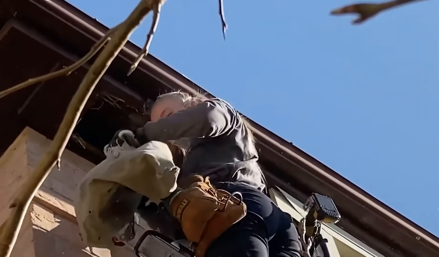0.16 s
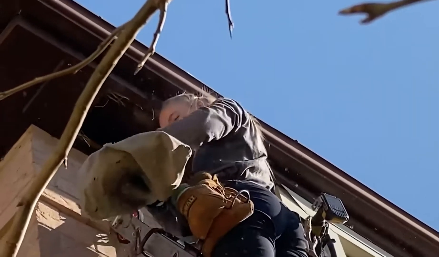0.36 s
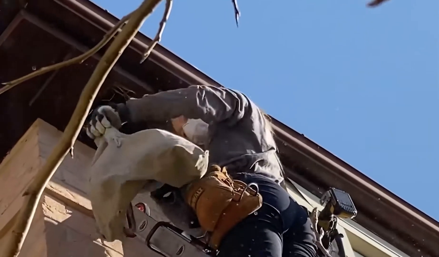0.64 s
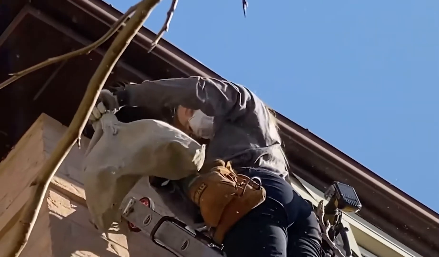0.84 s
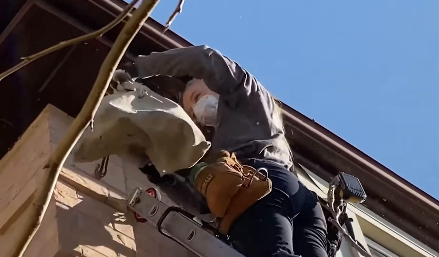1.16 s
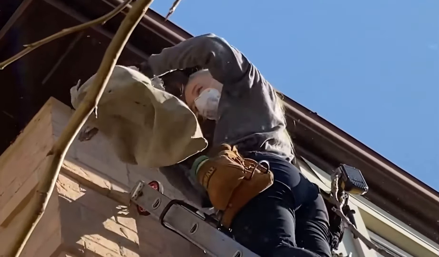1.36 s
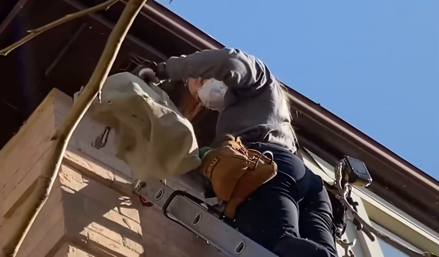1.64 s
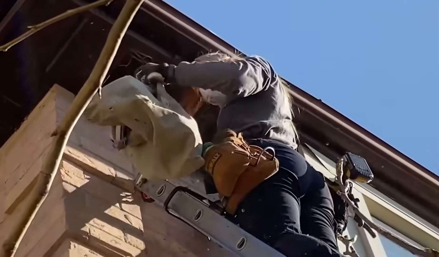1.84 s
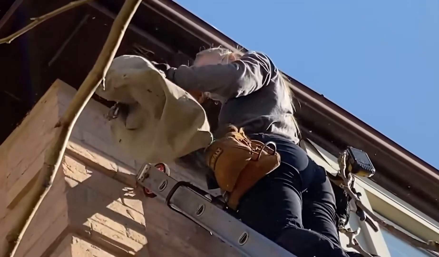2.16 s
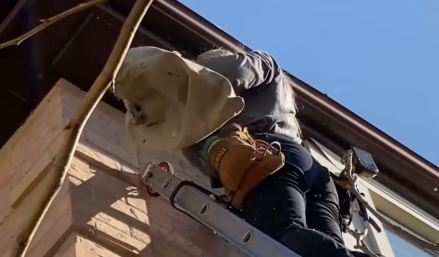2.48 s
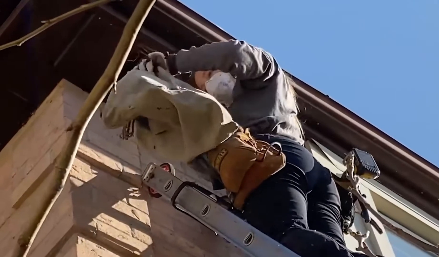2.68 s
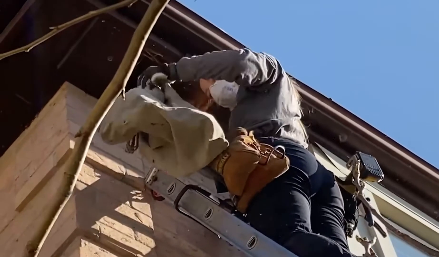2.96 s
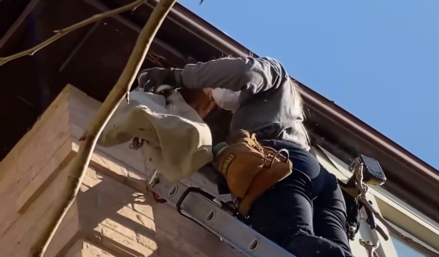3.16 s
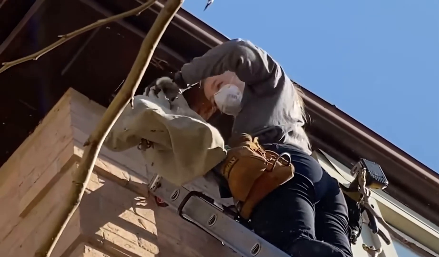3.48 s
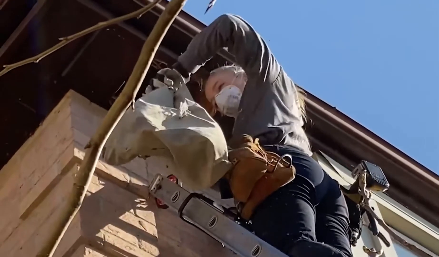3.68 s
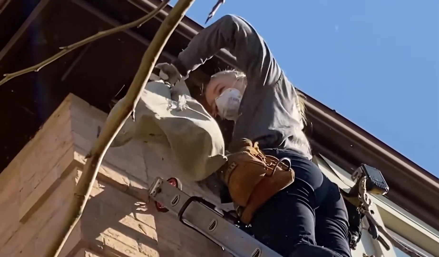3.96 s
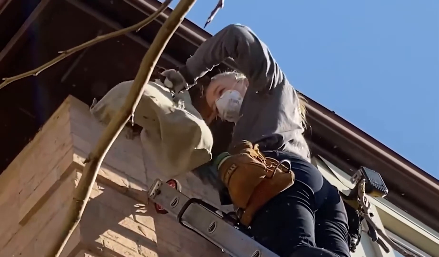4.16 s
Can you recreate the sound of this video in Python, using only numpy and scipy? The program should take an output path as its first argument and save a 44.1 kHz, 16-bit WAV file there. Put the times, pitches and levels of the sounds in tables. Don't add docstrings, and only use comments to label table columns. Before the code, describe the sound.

Harsh quick animal chirps in bouts fade to a thin broken whimper, followed by soft bag rustles and a faint far bird outdoors.

```python
import sys
import numpy as np
from scipy import signal
from scipy.fft import rfft, irfft, next_fast_len
from scipy.io import wavfile
from scipy.ndimage import map_coordinates

SR = 44100
rng = np.random.default_rng(int(sys.argv[2]) if len(sys.argv) > 2 else 0)


def volts_from_decibels(level):
    exponent = np.asarray(level, float) / 20
    return 10 ** exponent


def transcribe(signal):
    frames = np.atleast_2d(signal).T
    limited = np.clip(frames, -1, 1)
    pcm = np.round(limited * 32767).astype(np.int16)
    wavfile.write(sys.argv[1], SR, pcm)


N = 190644
T = np.arange(N) / SR

# frequency_hz, density_db (per Hz)
RASP = [(400, -42.5), (1000, -27), (1750, -14.5), (2150, 0.5), (4500, -3), (5100, -10), (6800, -15),
        (9500, -5.5), (12000, -14.5), (15500, -25)]


def unit(x):
    return x / np.sqrt(np.mean(x ** 2) + 1e-20)


def along(points, hz):
    f, value = np.transpose(points)
    return np.interp(np.log(hz + 1), np.log(f + 1), value)


def wobble(rate, size=N):
    knots = rng.standard_normal(size // 64 + 8)
    places = np.arange(0, size + 32, 32)
    coarse = map_coordinates(knots, [places * rate / SR])
    return np.interp(np.arange(size), places, coarse)


def filtered(x, response):
    size = next_fast_len(x.shape[-1] + 2048)
    spectrum = rfft(x, size) * response(np.fft.rfftfreq(size, 1 / SR))
    return irfft(spectrum, size)[..., :x.shape[-1]]


def noise(spectrum, shape=(2, N)):
    return unit(filtered(rng.standard_normal(shape), lambda hz: volts_from_decibels(along(spectrum, hz))))


def chirps(table, onset, release, bright_db, rise=0.01504, jitter=.018, flutter_hz=290, flutter=.25, patchy_db=5):
    # frequency_hz, gain_db
    throat = [(1500, -7), (1900, -21.5), (2030, -12), (2200, 5.5), (3000, 15), (3800, -5), (4400, -1.5),
              (5500, -23.5), (6000, -27.5), (15000, -25)]
    breakup_db = 9
    out = np.zeros(N + SR)
    t = np.arange(-2048, 2048) / SR
    size = len(t)
    for s, length, hz, tone_db, rasp_db in table:
        u = 2 * t / length
        shape = np.exp(-np.abs(u) ** np.where(u < 0, onset, release))
        skirt = np.exp(-np.abs(u / 2.1) ** 2)
        rough = 1 / (1 + volts_from_decibels(tone_db - rasp_db - 4.5))
        beat_hz = flutter_hz * (1 + .15 * wobble(60, size))
        beat = np.cos(2 * np.pi * np.cumsum(beat_hz) / SR)

        unsteady = rough * (jitter * wobble(300, size) + 0.037 * beat)
        pitch = hz * (1 + rise * np.clip(u, -2, 1) + unsteady)
        phase = 2 * np.pi * np.cumsum(pitch) / SR
        tone = unit(sum(volts_from_decibels(along(throat, k * hz)) * np.sin(k * phase) for k in range(1, 7)))

        drift = 1 + jitter * wobble(250, size) + 0.074 * beat
        second = np.sin(2 * np.pi * np.cumsum(tightening(s) * drift) / SR)
        second = volts_from_decibels(np.clip(3 * wobble(150, size), -9, 3)) * second

        ripple = patchy_db * rng.standard_normal(80)
        effort_db = bright_db + .15 * (rasp_db + 20.5)
        mouth = lambda f: volts_from_decibels(np.interp(f / 200, range(80), ripple) + effort_db * (f > 4500))
        breath = filtered(noise(RASP, shape=size), mouth)
        rasp = 0.6 * unit((1 + flutter * beat) ** 2 * breath) + 0.65 * second

        voiced = (shape + .06 * skirt) * volts_from_decibels(tone_db) * (1 + 0.28 * rough * beat) * tone
        voiced = voiced * volts_from_decibels(rough * np.clip(breakup_db * wobble(220, size), -14, 5))
        chirp = voiced + (shape + 0.36 * skirt) * volts_from_decibels(rasp_db) * rasp
        out[round(s * SR):][:size] += chirp
    return out[2048:][:N]


def tightening(s):
    bout_starts = [
        0,
        .72,
        1.4,
        2.26,
    ]
    from_hz, to_hz, wait_s, climb_s = 2400, 3270, .05, .09
    since = max(s - wait_s - max(start for start in bout_starts if start <= s), 0)
    return to_hz - (to_hz - from_hz) * np.exp(-since / climb_s)


def hoarse(width_hz=220):
    # peak_s, hold_s, level_db, fall_db_per_s
    swells = [
        (0, .05, -41, 52),
        (.905, .012, -43, 123.5),
        (1.59, .13, -45, 109.5),
        (2.38, .05, -63.5, 38.5),
    ]
    rise_db_per_s = 184
    level = sum(volts_from_decibels(db - rise_db_per_s * np.maximum(s - T, 0) - fall * np.maximum(T - s - hold, 0))
                for s, hold, db, fall in swells)

    def ring(f, center_hz):
        band = 1j * width_hz * f
        return 1.4 * band / (center_hz ** 2 - f * f + band)

    rings = lambda f: 1 + sum(ring(f, center_hz) for center_hz in (2150, 2800, 3900))
    return volts_from_decibels(3.5 + 2.7 * wobble(45)) * level * unit(filtered(noise(RASP, shape=N), rings))


def grunts(ring=.9):
    # middle_s, level_db, chest_pitch_hz
    puffs = [(.051, -41.5, 1558), (.132, -45.5, 1497), (.205, -42, 1572), (.275, -45, 1560),
             (.375, -39, 1400), (.812, -46, 974), (.894, -41.5, 1487), (1.006, -41.5, 1440),
             (1.124, -52, 1550), (1.557, -47, 883), (1.635, -42.5, 1262), (1.74, -38, 1095),
             (1.803, -37.5, 1149), (1.839, -45, 1443), (2.264, -45, 1000), (2.337, -45, 800),
             (2.766, -47, 850)]
    # frequency_hz, density_db (per Hz)
    chest = [(350, -23.5), (700, -4.5), (1000, -2), (1500, -2), (2300, 0.5), (3200, -43.5)]
    length_s = 0.026
    s, db, hz = np.transpose(puffs)
    level = sum(volts_from_decibels(peak_db) * np.exp(-(2 * (T[::8] - middle) / length_s) ** 2) for middle, peak_db in zip(s, db))
    nearest = np.searchsorted((s[1:] + s[:-1]) / 2, T)
    pitch = hz[nearest] * (1 + .06 * wobble(150))
    tone = np.sin(2 * np.pi * np.cumsum(pitch) / SR)
    return np.repeat(level, 8)[:N] * (noise(chest, shape=N) + ring * tone)


def whimper(breaks_db=9):
    # time_s, pitch_hz, level_db, opening_db (second partial over fundamental)
    cry = [
        (2.385, 1930, -56, -5.5),
        (2.408, 1882, -57.5, 4),
        (2.46, 1850, -58, 0.5),
        (2.564, 1867, -52.5, -2),
        (2.583, 1770, -59, 1),
        (2.616, 1751, -60.5, 7.5),
        (2.705, 1877, -57.5, 3.5),
        (2.73, 1716, -60.5, 6.5),
        (2.755, 1523, -66, 0.5),
    ]
    s, hz, level_db, opening_db = np.transpose(cry)
    pitch = np.interp(T, s, hz) * (1 + .008 * wobble(60) + .02 * wobble(400))
    phase = 2 * np.pi * np.cumsum(pitch) / SR
    level = volts_from_decibels(np.interp(T, np.r_[s[0] - .02, s, s[-1] + .02], np.r_[-110, level_db, -110]))
    low = level * volts_from_decibels(-breaks_db * np.abs(wobble(60))) * np.sin(phase)
    high = level * volts_from_decibels(np.interp(T, s, opening_db) - breaks_db * np.abs(wobble(45)))
    upper = np.sin(2 * phase) + 0.049 * np.sin(4 * phase) + 0.037 * np.sin(5 * phase)
    return volts_from_decibels(12) * (low + high * upper)


def whistles(calls, blur, edge=3.0):
    out = np.zeros(N)
    for s, length, first_hz, last_hz, db in calls:
        u = (T - s) / length
        glide = first_hz + (last_hz - first_hz) * np.clip(u, 0, 1)
        hz = glide * (1 + blur * wobble(250))
        level = volts_from_decibels(db + 8 - 6 * np.abs(wobble(45))) * np.exp(-np.abs(2 * u - 1) ** edge)
        out += level * np.sin(2 * np.pi * np.cumsum(hz) / SR)
    return out


def mews():
    # start_s, length_s, first_pitch_hz, last_pitch_hz, level_db
    calls = [
        (.49, 0.13, 1370, 1564, -57.5),
        (.62, 0.034, 1676, 1700, -50.5),
        (1.885, 0.05, 1930, 1995, -50),
        (1.96, 0.056, 1950, 1995, -47.5),
        (2.29, 0.054, 1040, 1124, -60),
        (2.62, 0.081, 900, 972, -58),
        (2.77, 0.099, 1286, 1415, -64),
    ]
    return whistles(calls, blur=.014)


def bag():
    # time_s, peak_db, fade_s
    creases = [
        (2.1795, -44, 0.018),
        (3.0185, -50.5, 0.062),
        (3.5129, -41, 0.05),
        (3.5394, -54, 0.038),
        (3.5782, -49.5, 0.05),
        (3.6514, -56.5, 0.043),
        (3.7703, -46, 0.0095),
        (4.1394, -49.5, 0.05),
    ]
    # middle_s, width_s, level_db
    stirs = [
        (.1, .6, -59.5),
        (1.3, .15, -71),
        (2.55, 0.25, -65),
        (3.2, 0.25, -73),
        (3.62, 0.14, -66),
        (4.2, .08, -70),
    ]
    # frequency_hz, density_db (per Hz)
    canvas = [(600, -8), (1500, 2.5), (4000, -6.5), (6500, -13), (9000, -14.5), (15500, -20)]
    air = [(900, -25.5), (1800, 5), (2500, 4.5), (4000, 0), (7000, -20), (11000, -14), (12500, -32),
           (15500, -51.5)]
    snap_s, snap, rest_db = 0.003, 0.68, -77
    level = np.zeros(N)
    for s, db, fade in creases:
        since = np.maximum(T - s, 0)
        attack = np.clip((T - s) / .003 + 1, 0, 1)
        level += volts_from_decibels(db - 12.5) * attack * (np.exp(-since / max(fade, .02)) + snap * np.exp(-since / snap_s))
    stir = volts_from_decibels(rest_db) + sum(volts_from_decibels(db) * np.exp(-((T - s) / width) ** 2) for s, width, db in stirs)
    return level * volts_from_decibels(2.5 * wobble(190)) * noise(canvas) + stir * volts_from_decibels(1.6 * wobble(18)) * noise(air)


def bird():
    # start_s, length_s, first_pitch_hz, last_pitch_hz, level_db
    song = [
        (3.93, .08, 6980, 6950, -67),
        (4.09, .14, 6830, 6850, -69),
    ]
    return whistles(song, blur=.016)


def town():
    # frequency_hz, density_db (per Hz)
    rumble_color = [(20, -28.5), (32, -14), (45, -5.5), (65, 0), (90, -2.5), (140, -11.5), (250, -14),
                    (400, -28.5), (600, -57)]
    rush_color = [(60, -62), (150, -1), (300, 0), (400, 0), (700, -4.5), (1400, -11.5), (2200, -25),
                  (4000, -58.5)]
    # frequency_hz, level_db, beat_swing_db
    hum_lines = [(120.5, 2, 7), (243.2, -6.5, 2), (363.2, -7, 3.5), (614, -24, 4.5)]
    rumble_db, rush_db, hum_db = -43, -50.5, -48.5
    beat_s, loudest_s, sharpness = 3.65, .58, 1.3
    rumble = volts_from_decibels(rumble_db + 1.2 * wobble(2.2)) * noise(rumble_color)
    rush = volts_from_decibels(rush_db + .5 * wobble(1.6) + 1.0 * wobble(12)) * noise(rush_color)
    beat = np.tanh(sharpness * np.cos(2 * np.pi * (T - loudest_s) / beat_s))
    hum = sum(volts_from_decibels(db + swing_db * beat + 0.92 * wobble(7.2)) * np.sin(2 * np.pi * hz * T + 0.59 * wobble(6))
              for hz, db, swing_db in hum_lines)
    return rumble + rush + volts_from_decibels(hum_db) * hum


def eave(x, wall_s=0.019, wall_db=-14, tail_db=-13):
    # frequency_hz, t60_s
    decay = [(500, 0.85), (3000, 0.49), (12000, 0.28)]
    hz, t, z = signal.stft(rng.standard_normal((2, SR // 2)), SR, nperseg=256)
    tail = signal.istft(z * volts_from_decibels(-60 * t / along(decay, hz)[:, None]), SR, nperseg=256)[1]
    tail = volts_from_decibels(tail_db) * tail / np.linalg.norm(tail[0])
    slap = volts_from_decibels(wall_db) * np.pad(x, (round(wall_s * SR), 0))[:N]
    scattered = signal.fftconvolve(np.pad(x, (300, 0))[None], tail, axes=1)[:, :N]
    return x + slap + scattered


def scene():
    # middle_s, length_s, pitch_hz, tone_db, rasp_db
    swelling = [(.002, 0.039, 1700, -38.5, -29.5), (.061, 0.022, 1494, -28, -26),
                (.138, 0.017, 1914, -27, -24.5), (.213, 0.023, 1898, -23.5, -24.5),
                (.286, 0.029, 1893, -21.5, -24), (.321, 0.02, 1895, -32.5, -45),
                (.381, 0.017, 2040, -28.5, -22.5), (.414, 0.0068, 2010, -53, -43),
                (.744, .013, 2050, -46, -33), (.775, .036, 2014, -57, -46.5),
                (.819, .021, 1811, -37, -30.5), (.9, 0.022, 1884, -24, -24),
                (.984, 0.034, 1950, -61, -41.5), (1.009, .021, 1813, -30, -28.5),
                (1.128, 0.017, 2080, -60, -51)]
    abrupt = [(1.425, 0.018, 1841, -24, -37.5), (1.445, .008, 1795, -39, -51),
              (1.487, .03, 2063, -22.5, -23.5), (1.52, .026, 2022, -37, -46),
              (1.558, 0.039, 1976, -19.5, -20), (1.6, .05, 1950, -48, -31), (1.647, .03, 2090, -26, -27.5),
              (1.746, 0.023, 2079, -25, -25), (1.808, .025, 1930, -33, -28),
              (1.829, .027, 2124, -26.5, -25.5), (1.992, .068, 2102, -56, -42.5),
              (2.093, 0.036, 1900, -70, -55), (2.269, .019, 1690, -53, -53),
              (2.337, .035, 1682, -42, -40.5), (2.413, 0.029, 1860, -56, -49),
              (2.446, 0.016, 1800, -50, -51), (2.76, .024, 1780, -68, -66)]
    kits = chirps(swelling, onset=2.8, release=3.5, bright_db=5.5)
    kits = kits + chirps(abrupt, onset=4.7, release=2.5, bright_db=-3.5)
    kits = kits + hoarse() + grunts() + whimper() + mews()
    return eave(kits + bird()) + bag() + town()


def low_pass(x):
    return signal.sosfilt(signal.butter(12, 15700, fs=SR, output="sos"), x)


def record(dry):
    # frequency_hz, gain_db
    port_sum = [(20, -1.5), (4500, -0.5), (6500, -1), (8000, -14), (8800, -21.5), (11800, -20),
                (12800, -6.5), (15500, -1.5)]
    port_difference = [(30, -54.5), (70, -43.5), (110, -43), (200, -19), (380, -10.5), (700, 0), (1290, -3),
                       (2000, -11.5), (3800, -11), (5000, 1.5), (8000, -1), (12000, -4.5), (15500, -2)]
    # frequency_hz, share of the difference that follows the sum
    left_lean = [(100, 0.088), (400, .3), (1000, .35), (2000, 0.04)]
    top_hz = 15750
    share = lambda hz: np.clip(along(left_lean, hz), 0, 1)
    mid = filtered(dry[0], lambda hz: volts_from_decibels(along(port_sum, hz)) * (hz < top_hz))
    ahead = filtered(dry[1], lambda hz: 1j * np.sqrt(1 - share(hz) ** 2))
    leaning = filtered(dry[0], share)
    side = filtered(ahead + leaning, lambda hz: volts_from_decibels(along(port_difference, hz)) * (hz < top_hz))
    pair = np.array([mid + side, mid - side])
    pair = pair / (1 + np.abs(pair / .48) ** 4) ** .25
    return low_pass(pair)


dry = scene()
out = record(dry)
transcribe(out)
```